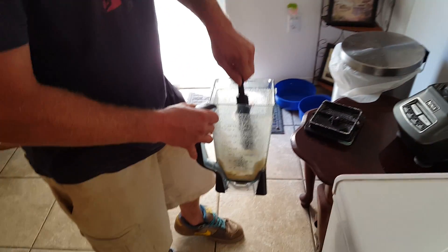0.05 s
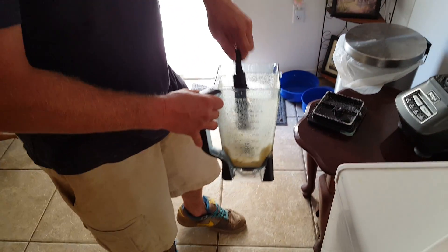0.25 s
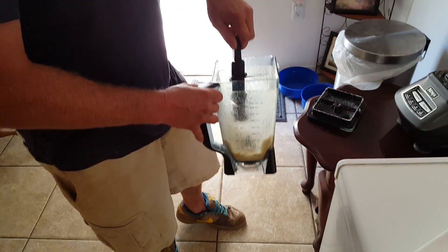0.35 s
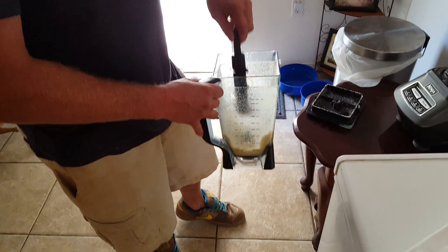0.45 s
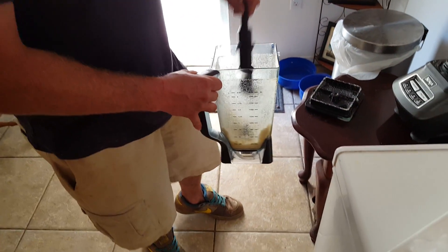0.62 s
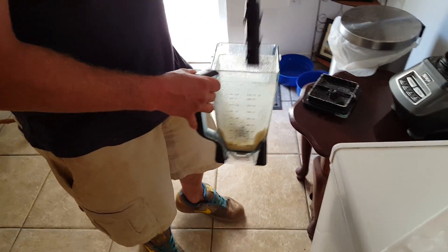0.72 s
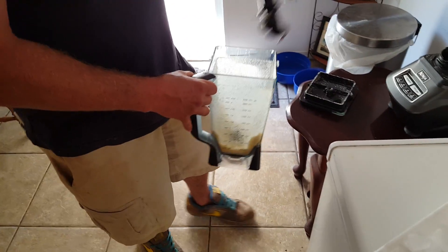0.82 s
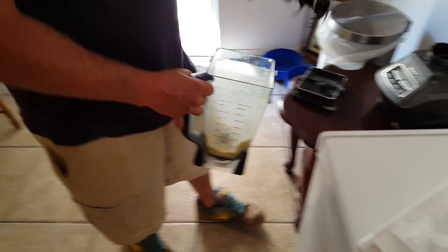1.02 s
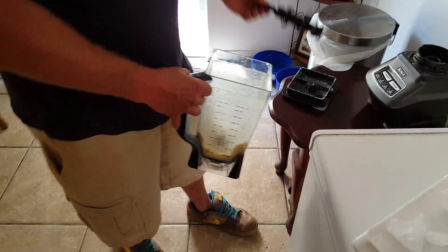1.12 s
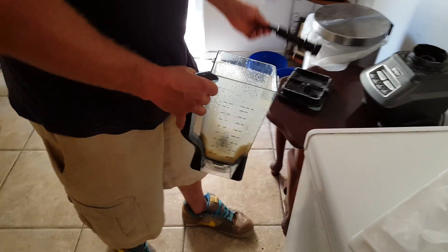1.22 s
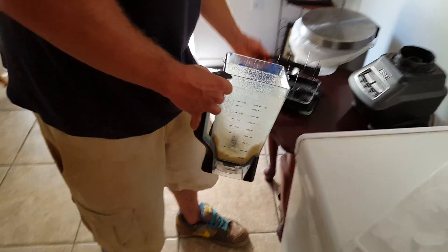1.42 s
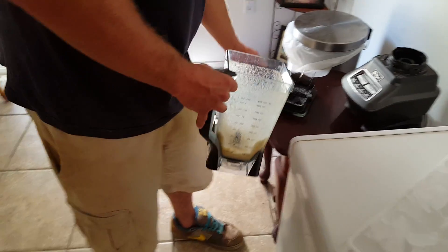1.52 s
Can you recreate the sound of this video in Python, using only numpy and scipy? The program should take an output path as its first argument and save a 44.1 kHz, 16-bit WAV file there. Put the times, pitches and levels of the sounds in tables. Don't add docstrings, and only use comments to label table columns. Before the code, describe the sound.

Quick cluster of boomy plastic knocks and dragging against a blender jug, a sharp clack with a brief blade ring, fading taps, then near quiet with soft rustling; recorded close, slightly right, in an echoing kitchen.

```python
import sys
import numpy as np
from scipy import signal
from scipy.fft import rfft, irfft, next_fast_len
from scipy.io import wavfile

SR = 44100
rng = np.random.default_rng(int(sys.argv[2]) if len(sys.argv) > 2 else 0)


def output_pcm(signal):
    pcm = np.clip(np.atleast_2d(signal).T, -1, 1) * 32767
    wavfile.write(sys.argv[1], SR, np.round(pcm).astype(np.int16))


def makeup_ratio(level_db):
    decades = np.asarray(level_db, float) / 20
    return 10 ** decades


N = 68355
LEFT_RIGHT = np.array([[1], [-1]])


def rms_one(x):
    return x / np.sqrt(np.mean(x ** 2) + 1e-20)


def in_time(rows):
    start_s, *columns_db = np.transpose(rows)
    t = np.arange(N) / SR
    return [makeup_ratio(np.interp(t, start_s, level_db)) for level_db in columns_db]


def at_hz(points, hz):
    points_hz, value = np.transpose(points)
    return np.interp(np.log(hz), np.log(points_hz), value)


def high_or_band(x, order, edge_hz, kind):
    return signal.sosfilt(signal.butter(order, edge_hz, kind, fs=SR, output="sos"), x)


def colour(x, points, lead=((1, 0), (2, 0))):
    size = next_fast_len(x.shape[-1] + 4096)
    hz = np.arange(size // 2 + 1) * SR / size + 1
    response = makeup_ratio(at_hz(points, hz)) * np.exp(1j * at_hz(lead, hz))
    return irfft(rfft(x, size) * response, size)[..., :x.shape[-1]]


def bright_noise(spectrum, channels=1):
    noise = colour(rng.standard_normal((channels, N)), spectrum)
    return rms_one(high_or_band(noise, 2, 1200, "high")).squeeze()


def cracks(start_s, level_db, spectrum, t60_s, channels=1):
    clicks = np.full(N, 1e-18)
    clicks[(np.asarray(start_s) * SR).astype(int)] += makeup_ratio(level_db)
    fall = signal.lfilter([1], [1, -makeup_ratio(-60 / (t60_s * SR))], clicks)
    return fall * bright_noise(spectrum, channels)


def body(modes, start_s, level_db, chatter=0):
    contact_s, spread_db = 0.0006, 1.13
    out = np.zeros(N)
    for k, (hz, mode_db, t60_s) in enumerate(modes):
        late_s = contact_s * abs(rng.standard_normal(len(start_s)))
        strike_db = level_db + spread_db * rng.standard_normal(len(start_s))
        clicks = np.full(N, 1e-18) + chatter
        np.add.at(clicks, np.minimum((start_s + late_s) * SR, N - 1).astype(int), makeup_ratio(strike_db))
        r, w = makeup_ratio(-60 / (t60_s * SR)), 2 * np.pi * hz / SR
        ring = signal.lfilter([0, np.sin(w)], [1, -2 * r * np.cos(w), r * r], clicks)
        out += (-1) ** k * makeup_ratio(mode_db) * ring
    return out


EDGES_HZ = 25 * 2 ** np.arange(0, 9.6, .5)


def bands(white):
    for k, (low_hz, high_hz) in enumerate(zip(EDGES_HZ, EDGES_HZ[1:])):
        yield np.sqrt(low_hz * high_hz), high_or_band(white[k % 2], 2, [low_hz, high_hz], "band")


# hz, likeness_0_to_1
DIFFUSE_LIKENESS = [(40, 0.93), (250, 0.88), (700, 0.33), (2000, 0.067), (10000, 0.031)]


def diffuse(mid, side, hz):
    alike = at_hz(DIFFUSE_LIKENESS, hz)
    return np.sqrt(1 + alike) * mid + np.sqrt(1 - alike) * side * LEFT_RIGHT


# hz, level_db_per_hz
HUM_COLOUR = [(12, -36), (20, -36), (43, -7), (157, 1.5), (270, -2.5), (312, -8), (439, -5), (800, -16.5),
              (1500, -29), (1950, -67), (3300, -120)]
# hz, lean_db
HUM_LEAN = [(40, -.6), (150, -1.1), (400, -2.0), (1500, -2.2)]


def hum():
    out = 0
    for hz, noise in bands(rng.standard_normal((2, 2, N + SR // 4))):
        mid, side = noise[:, -N:]
        level_db = at_hz(HUM_COLOUR, hz) + at_hz(HUM_LEAN, hz) * LEFT_RIGHT
        out = out + makeup_ratio(level_db) * diffuse(mid, side, hz)
    return makeup_ratio(-49.5) * rms_one(out)


# hz, level_db_per_hz
HISS_COLOUR = [(900, -40), (1700, -14), (2900, -11), (5200, -14.5), (9500, -24), (12500, -14),
               (15500, -12.5)]


def hiss():
    return makeup_ratio(-71) * bright_noise(HISS_COLOUR, channels=2)


# start_s, dull_db, bright_db
RUSTLE = [(0, -62.5, -88), (.18, -72, -94), (.9, -72, -81), (1.0, -94, -101), (1.13, -88, -91),
          (1.15, -72, -77), (1.175, -70, -73), (1.205, -68, -60.5), (1.235, -69, -70), (1.3, -67, -74),
          (1.43, -71, -88), (1.55, -90, -101)]
# hz, level_db_per_hz
RUSTLE_COLOUR = [(710, -41), (1200, 2), (1740, 11.5), (2470, -1), (3650, -4.5), (6000, -14), (7800, -48),
                 (13200, -120)]
# hz, level_db_per_hz
SWISH_COLOUR = [(4120, -27), (7000, -9), (10100, -18), (11600, -17), (13000, -1), (16000, -4)]


def rustle():
    dull, bright = in_time(RUSTLE)
    return dull * bright_noise(RUSTLE_COLOUR) + bright * bright_noise(SWISH_COLOUR)


# start_s, low_db, rim_db
DRAG = [
    (.2, -62.5, -71),
    (.215, -42, -36.5),
    (.27, -36, -44),
    (.3, -31.5, -36),
    (.385, -34, -37.5),
    (.41, -31.5, -50),
    (.435, -44.5, -53),
    (.51, -41.5, -53.5),
    (.62, -43, -48),
    (.76, -61, -59.5),
]


def drag():
    grains_per_s = 700
    low, high = in_time(DRAG)
    size_db = 0.83 * np.minimum(rng.exponential(1, N), 4)
    sizes = makeup_ratio(size_db) * rng.choice([-1, 1], N)
    return low, high, sizes * (rng.random(N) < grains_per_s / SR)


# start_s, cavity_db, base_db, wall_db, rim_db
KNOCKS = [(0.2088, -14.5, -22, -18, -22.5), (0.2114, -13, -48, -23, -21.5), (0.2199, -52, -23, -25, -31),
          (0.2258, -19, -21, -38, -31), (.246, -53, -38, -21.5, -26), (0.283, -12, -35, -24, -17.5),
          (.2850, -21, -17, -20.5, -12.5), (0.2879, -12.5, -29, -30, -21), (0.2997, -28, -19, -28, -32),
          (0.308, -15, -29, -26, -26), (.329, -19.5, -17, -30.5, -27), (0.352, -13.5, -53, -29, -25.5),
          (.3698, -25, -19, -22.5, -23), (0.3785, -17.5, -43, -22, -36), (0.3904, -41, -58, -24, -20.5),
          (0.3961, -17, -34, -18.5, -22.5), (.4025, -54, -15, -19.5, -27), (.411, -17, -14, -27.5, -32),
          (0.5017, -19.5, -19, -19, -19), (0.5046, -22.5, -16, -18, -17), (.530, -61, -41, -28, -29),
          (0.5498, -17.5, -17, -21.5, -23), (.555, -18, -14.5, -30, -41), (.576, -30, -31, -29.5, -28),
          (.6188, -28, -20, -26.5, -25.5), (.66, -52, -29, -37, -50), (.718, -43, -31, -54, -45),
          (.75, -61, -36, -50, -47), (1.5465, -64, -59, -25, -38.5)]
# pitch_hz, level_db, t60_s
CAVITY = [(280, -59, 0.056), (364, 0, 0.11), (409, -11, 0.17), (445.4, -8.5, 0.12)]
# pitch_hz, level_db, t60_s
BASE = [(499, -4, 0.11), (523, -3, 0.096)]
# pitch_hz, level_db, t60_s
WALL = [(655.5, -8, 0.12), (691.5, 0.5, 0.23), (818.3, -3.5, 0.15)]
# pitch_hz, level_db, t60_s
RIM = [(1229, -6.5, 0.031), (1388, 1.5, 0.029), (1442, 4, 0.011), (1857, -2, 0.023), (2124, -4.5, 0.015),
       (2233, -4, 0.017), (2370, -1.5, 0.01), (2574, -8, 0.024), (2730, -10, 0.02), (3036, -10.5, 0.015),
       (3269, -14, 0.043), (3710, -22, 0.013), (4430, -22, 0.021)]


def knocks(low_chatter, rim_chatter):
    start_s, cavity_db, base_db, wall_db, rim_db = np.transpose(KNOCKS)
    return (body(CAVITY, start_s, cavity_db, low_chatter)
            + body(BASE, start_s, base_db, low_chatter)
            + body(WALL, start_s, wall_db, makeup_ratio(-13.5) * low_chatter)
            + body(RIM, start_s, rim_db, rim_chatter))


# start_s, level_db
PANEL_LEVELS = [(.2090, -16), (.2114, -14), (0.2263, -27), (.246, -15.5), (.2850, -15.5), (0.2878, -20),
                (.308, -15.5), (.329, -21), (0.3523, -26), (0.3794, -34.5), (0.3908, -17.5), (.3965, -26),
                (0.402, -25), (0.5019, -20), (.5501, -27), (0.6182, -27), (1.5465, -30.5)]
# pitch_hz, level_db, t60_s
PANEL = [(903, -3, 0.099), (993, -6.5, 0.069), (1064, -5.5, 0.062), (1109, -9.5, 0.026)]


def panel(rim_chatter):
    return body(PANEL, *np.transpose(PANEL_LEVELS), makeup_ratio(-7) * rim_chatter)


# start_s, blade_db, shaft_db, crack_db
STEEL_HITS = [(0.2098, -66, -54, -32), (0.2144, -65, -25.5, -47.5), (0.2839, -58, -18.5, -27),
              (0.2888, -33, -36, -58), (0.3027, -29.5, -54, -46.5), (0.3692, -56, -27, -52),
              (0.3968, -66, -44, -33), (0.5027, -23, -27, -40), (.5030, -18.5, -23, -32),
              (0.55, -31, -23.5, -31), (0.588, -47, -37, -68), (0.6174, -59, -29.5, -67),
              (0.688, -60, -47, -57), (1.5465, -40, -62, -37.5)]
# pitch_hz, level_db, t60_s
BLADE = [(2937, 2, 0.065), (3091, -4, 0.052), (3043, -0.5, 0.046), (2977, -3.5, .07), (3180, -6.5, 0.045)]
# pitch_hz, level_db, t60_s
SHAFT = [(1602, 7.2, 0.031), (1708, 1.7, 0.07), (1760, 1.7, 0.038)]
# start_s, level_db
TREMBLE = [
    (.5, -92),
    (.504, -55),
    (.6, -57),
    (.625, -63),
    (.74, -80),
    (.8, -95),
]


def steel(grains):
    start_s, blade_db, shaft_db, _ = np.transpose(STEEL_HITS)
    tremble, = in_time(TREMBLE)
    return body(BLADE, start_s, blade_db, tremble * grains) + body(SHAFT, start_s, shaft_db)


# start_s, level_db
SLAPS = [
    (.2122, -8.5),
    (0.25, -26),
    (0.2847, -6.5),
    (0.2889, -27),
    (.3545, -12),
    (.398, -33),
]
# pitch_hz, level_db, t60_s
SLAP = [(700, 0, .0035)]


def slaps():
    return body(SLAP, *np.transpose(SLAPS))


# hz, level_db_per_hz
CRACK_COLOUR = [(2060, -34), (3500, -0.5), (4540, -8), (5000, -15), (6280, -8), (8420, -9.5), (9140, -13),
                (11900, -7.5), (16000, -18.5)]


def contact_noise(rim_drag):
    likeness = 0.4
    start_s, _, _, crack_db = np.transpose(STEEL_HITS)
    own, shared = cracks(start_s, crack_db, CRACK_COLOUR, t60_s=0.033, channels=2)
    left = likeness * shared + np.sqrt(1 - likeness ** 2) * own
    drag_hiss = makeup_ratio(-11) * rim_drag * bright_noise(CRACK_COLOUR, channels=2)
    return np.array([left, shared]) + drag_hiss


def pitcher():
    mouth_hz, contact_hz = 254, 4020
    low, high, grains = drag()
    rings = knocks(low * grains, high * grains) + panel(high * grains) + steel(grains) + slaps()
    return high_or_band(rings, 3, [mouth_hz, contact_hz], "band") + contact_noise(high)


# hz, t60_s
ROOM_T60 = [(200, 0.22), (600, 0.58), (1000, 0.36), (1700, 0.52), (2800, 0.32), (5000, 0.58), (12000, 0.48)]
# hz, level_db
ROOM_COLOUR = [(250, -3), (450, -1.5), (1000, 0), (2000, -4), (4000, 3), (7000, 0), (12000, -2)]


def kitchen(x):
    room_db, lean_db, first_echo_s = -5, -2.5, 0.0045
    t, echo = np.arange(SR) / SR, 0
    for hz, (mid, side) in bands(rng.standard_normal((2, 2, SR))):
        t60_s = at_hz(ROOM_T60, hz)
        fall = makeup_ratio(at_hz(ROOM_COLOUR, hz) - 60 * t / t60_s) / np.sqrt(t60_s * SR / 7)
        echo = echo + diffuse(mid, side, hz) * fall
    echo = echo * np.clip(t / first_echo_s - 1, 0, 1)
    return signal.fftconvolve(x[None], echo, axes=1)[:, :N] * makeup_ratio(room_db + lean_db * LEFT_RIGHT)


# start_s, level_db
TICKS = [
    (1.146, -66),
    (1.2486, -52),
    (1.2763, -63),
    (1.3, -64),
    (1.38, -79),
    (1.425, -66),
]
# hz, level_db_per_hz
TICK_COLOUR = [(1500, -15), (3200, -10), (3750, 6), (4300, -12), (9000, -18), (11500, -3), (14500, -10),
               (16000, -8.5)]


def ticks():
    return cracks(*np.transpose(TICKS), TICK_COLOUR, t60_s=0.045)


# hz, level_db
LEAN = [(300, -5.5), (500, -3), (900, -9), (1500, -14), (2500, -14), (5000, -4.5), (9000, -14), (14000, 2)]
# hz, phase_rad
LEAD = [(860, 0.53), (1400, -2.5), (2150, -5.5), (9000, -4.5)]


def scene():
    hand_left_db = -5
    hand = rustle() + ticks()
    near_left, near_right = pitcher()
    left = colour(near_left, LEAN, LEAD) + makeup_ratio(hand_left_db) * hand
    right = near_right + hand
    return np.array([left, right]) + kitchen(right) + hum() + hiss()


def low_pass(x):
    return signal.sosfilt(signal.butter(12, 15950, fs=SR, output="sos"), x)


def record(dry):
    dip_hz, dip_width_hz, dip_share = 3360, 170, 0.6
    peak, cutoff_hz = 1.15, 16800
    dip = signal.lfilter(*signal.iirpeak(dip_hz, dip_hz / dip_width_hz, fs=SR), dry)
    rounded = peak * np.tanh((dry - dip_share * dip) / peak)
    mix = signal.sosfilt(signal.cheby2(12, 70, cutoff_hz, fs=SR, output="sos"), rounded)
    return low_pass(mix)


dry = scene()
out = record(dry)
output_pcm(out)
```